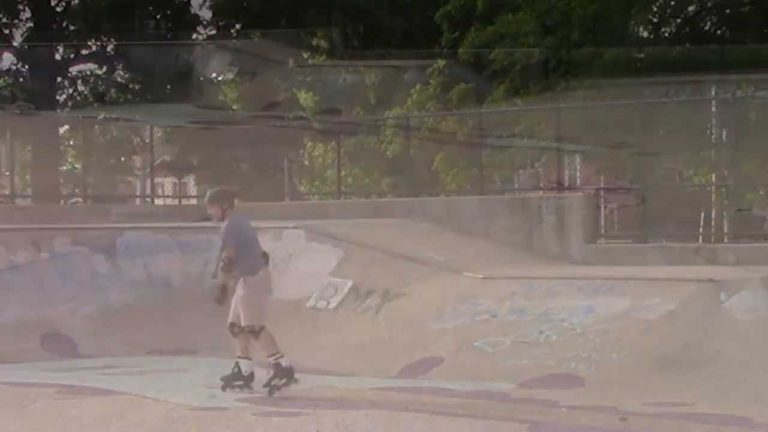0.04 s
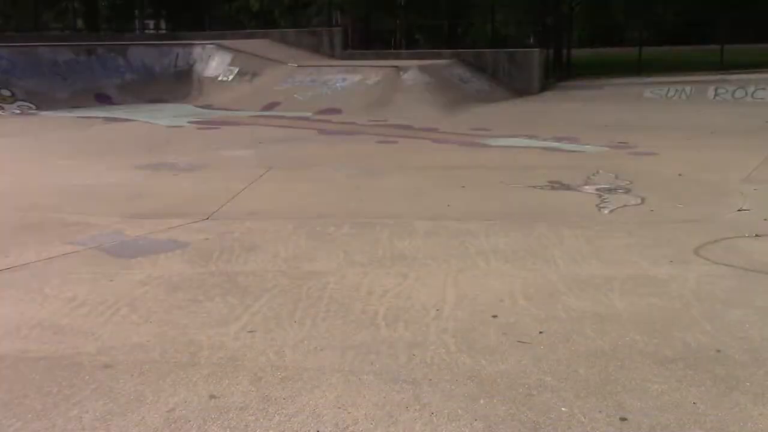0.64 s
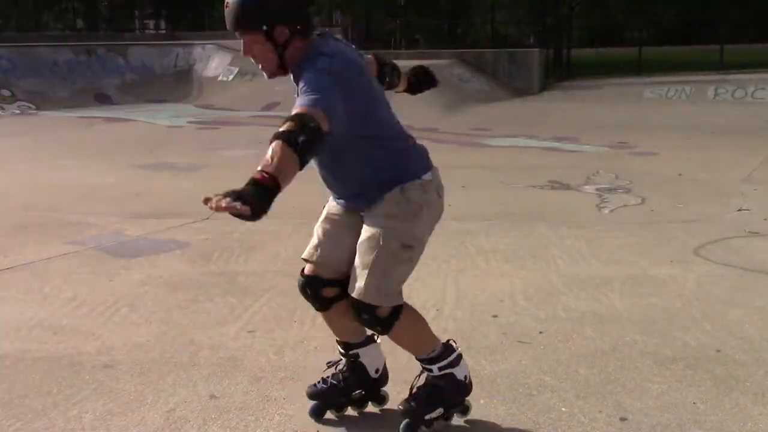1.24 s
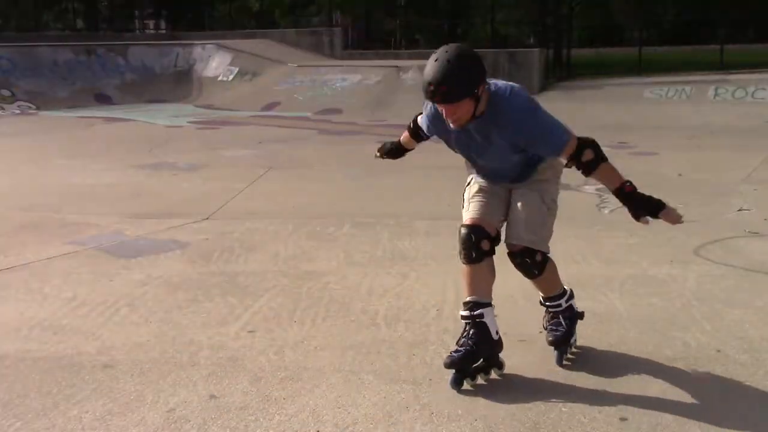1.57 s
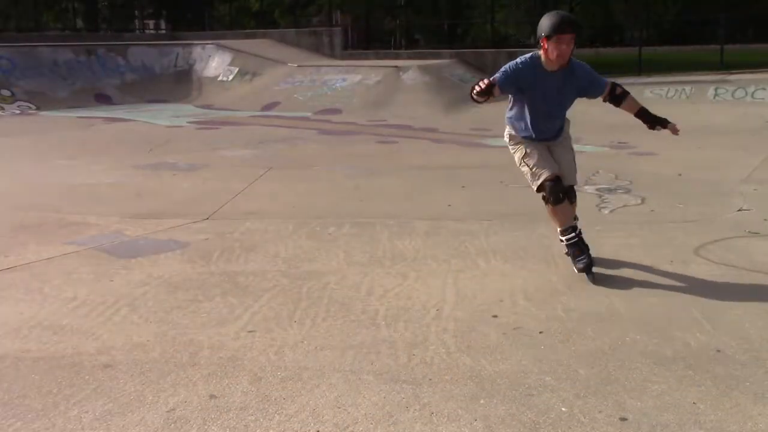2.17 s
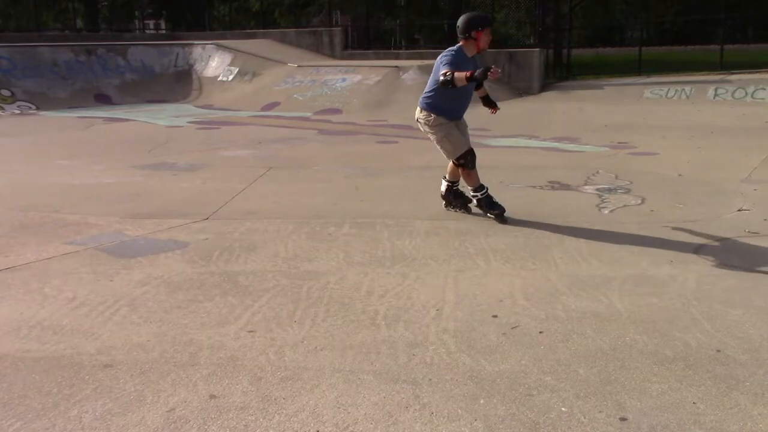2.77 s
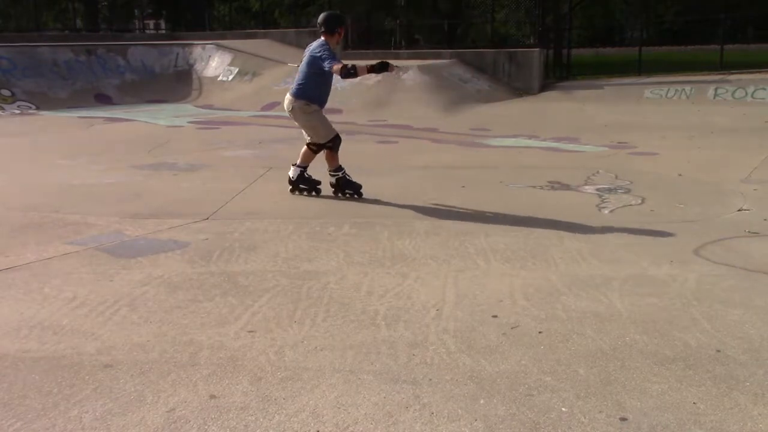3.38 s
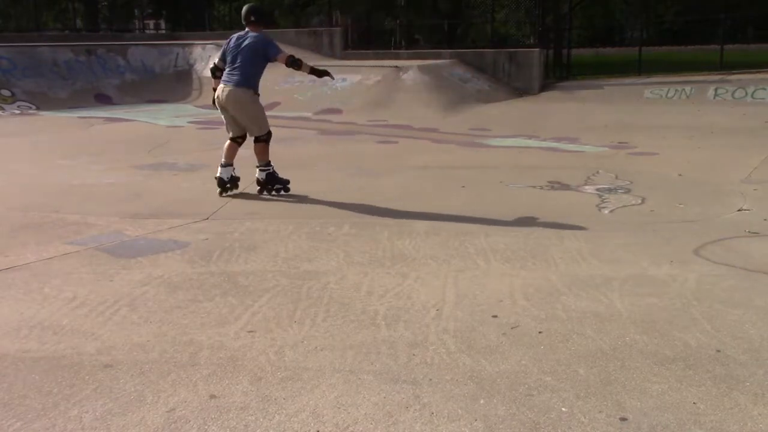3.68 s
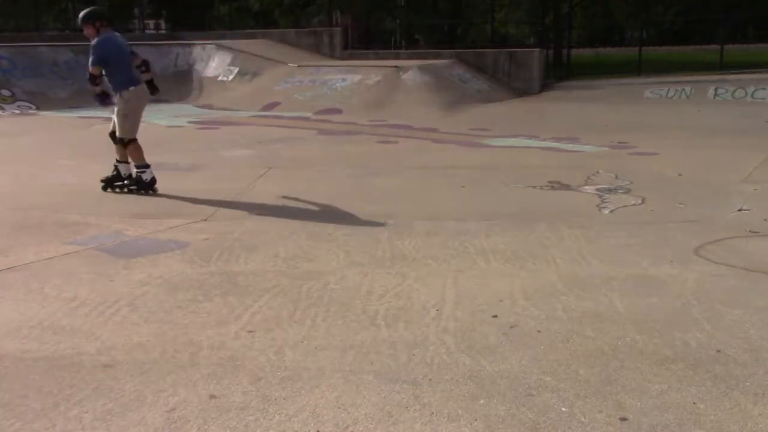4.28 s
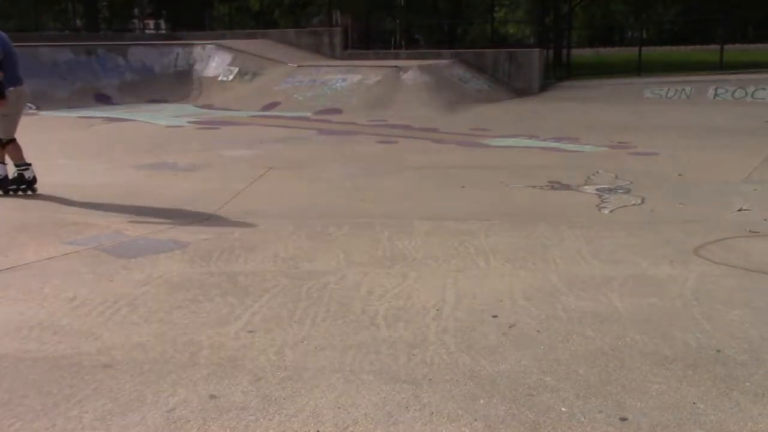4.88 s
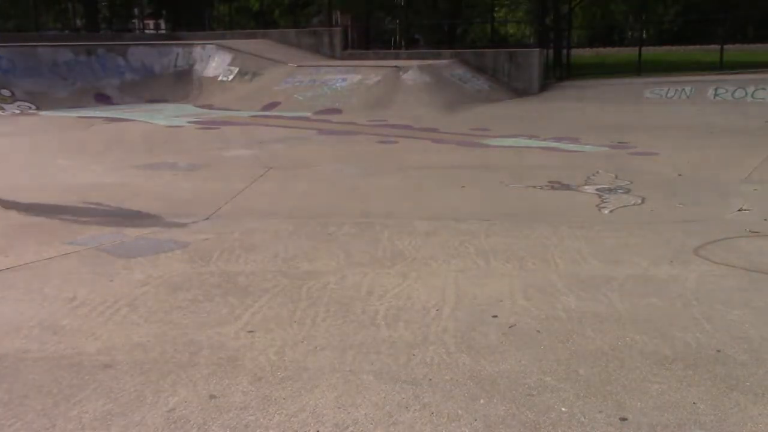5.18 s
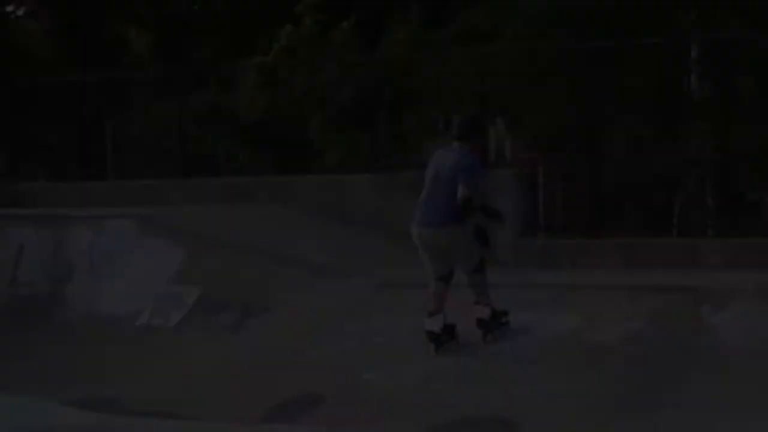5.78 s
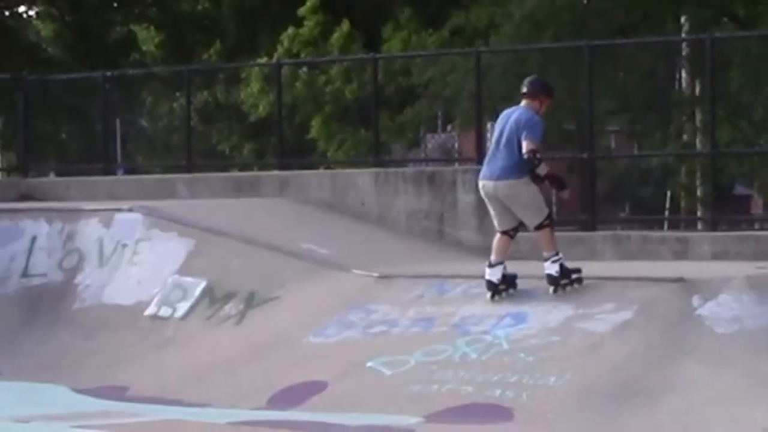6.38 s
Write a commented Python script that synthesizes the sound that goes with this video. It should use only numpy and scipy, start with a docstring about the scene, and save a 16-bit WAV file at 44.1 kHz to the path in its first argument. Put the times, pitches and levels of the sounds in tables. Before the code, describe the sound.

Wind rumbles on the microphone as a skater knocks over an edge, lands hard close by and rolls off, with faint birdsong behind.

```python
"""A concrete skate park: an inline skater rolls across, clacks over an edge, jumps, lands hard close by
and coasts away. Hard wheels drum on the gritty slab, so they roar and hiss, and grit and bearings tick.
Gusts of wind push on the microphone's two openings (its ports), making it rumble and flutter.
In the trees behind, a songbird whistles falling notes."""
import sys
import numpy as np
from scipy import signal
from scipy.fft import rfft, irfft, next_fast_len
from scipy.io import wavfile
from scipy.ndimage import uniform_filter1d

SR = 44100
rng = np.random.default_rng(int(sys.argv[2]) if len(sys.argv) > 2 else 0)


def master_out(mix):
    """Clip the mix to full scale and print it as 16-bit PCM to the path in sys.argv[1]."""
    frames = np.transpose(np.atleast_2d(mix))
    ceiling = np.clip(frames, -1, 1)
    pcm = np.round(ceiling * 32767).astype(np.int16)
    wavfile.write(sys.argv[1], SR, pcm)


N = 292383
TIME = np.arange(N) / SR

# Wheels on concrete, stage by stage. Each row: time in seconds, roar in dB, hiss in dB.
RUN_UP = [(0.0, -52.5, -56.5), (0.324, -50.5, -64.5), (0.69, -46, -57.5)]
IN_FLIGHT = [(0.78, -53.5, -61), (0.834, -54, -63), (1.18, -53, -65)]
RUN_OUT = [(1.29, -48.5, -55.5), (1.76, -49, -62), (1.91, -59, -70), (2.48, -49.5, -63.5),
           (2.93, -50.5, -63), (2.98, -57.5, -68), (3.47, -50, -62), (3.6, -54.5, -64), (3.7, -49, -62),
           (3.81, -60, -66.5), (3.87, -56, -62), (4.31, -52.5, -61.5), (4.4, -57.5, -70),
           (4.42, -58, -68.5)]
FAR_OFF = [(4.62, -63, -68), (4.85, -57.5, -62), (5.4, -58, -62), (6.13, -48.5, -51.5), (6.63, -49, -54)]
# The finest grit is only heard from nearby. Each row: time in seconds, boost for the grit in dB.
GRIT_NEARNESS = [(0.0, -11), (.8, -7), (1.6, -4), (2.1, -6.5), (3.4, -2), (4.1, -13), (6.63, -10.5)]
# Wheels, frames and cuffs slam home one after another. Each row: start in seconds, crack level in dB,
# crack fade time in seconds, ping pitch in Hz, ping level in dB, thud level in dB.
LANDING_HITS = [(1.2052, -22, 0.019, 1500, -7.5, -17), (1.2072, -7, 0.018, 8400, -7, -9),
                (1.2097, -5, 0.029, 6460, -17, -31.5), (1.2142, -17.5, 0.01, 7490, -9, -18.5),
                (1.216, -4.5, 0.011, 2550, -5, -26), (1.223, -15, 0.027, 1200, -20.5, -16.5),
                (1.2333, -5.5, 0.012, 3150, 4.5, -8.5), (1.2373, -19.5, 0.09, 3090, -15, -23.5),
                (1.2405, -14.5, 0.025, 7140, -11, -14)]
# Wheels knock over the edge. Each row: time in seconds, level in dB, treble cut-off in Hz.
EDGE_KNOCKS = [(0.7209, -10.5, 1297), (0.733, -9, 5510)]
# The tones of a struck part. Each row: pitch in Hz, level in dB, fade time in seconds.
BOOT_TONES = [(220, 3.5, 0.049), (340.3, 3.5, 0.038), (428, -4, 0.058), (727.5, -15.5, 0.0077),
              (912.5, -12.5, 0.1), (1126, -21.5, 0.12), (1520, -22.5, 0.04), (1516, -16.5, 0.032),
              (1910, -19, 0.022), (2690, -28.5, 0.045), (3200, -28, .04), (3650, -17, 0.043)]
WHEEL_TONES = [(363, -4, 0.022), (460, -0.5, 0.014), (633, -3, 0.018), (940, -6, 0.0098),
               (1496, -7.5, 0.012), (2344, -9, 0.0084), (3350, -7.5, 0.0078), (5650, -9, .004),
               (7300, -7.5, 0.0029)]
# Small clicks. Each row: time in seconds, level in dB.
MID_AIR_SNAPS = [(1.0282, -11.5), (1.0301, -16.5)]
GROUND_TICKS = [(0.395, -43), (1.3573, -37), (1.3788, -39), (2.0423, -41.5), (2.3425, -45.5), (2.7028, -45),
                (2.7313, -42), (3.1845, -50), (3.8756, -45), (3.941, -48), (4.6522, -46), (5.081, -46)]
# Dragging wheels. Each row: loudest moment in seconds, length in seconds, level in dB.
SCUFFS = [(0.724, 0.045, -33), (1.34, 0.14, -49.5), (1.52, 0.31, -45)]   # into the edge, and after the landing
TURN_SKIDS = [(3.70, 0.039, -46.5), (3.885, 0.031, -46.5), (3.965, 0.043, -46.5)]
# The tone colours of the skates' noises. Each row: frequency in Hz, relative strength in dB.
ROAR_COLOUR = [(30, -43), (70, -16), (150, -3.5), (300, 3), (550, 3.5), (1000, -1), (1900, -7),
               (3000, -14.5), (4500, -28), (8000, -37)]
HISS_COLOUR = [(1500, -6), (3000, 5), (4200, 1), (5500, -1), (7000, -2), (8600, -7), (10200, -9),
               (12000, -19), (15000, -39.5)]
GRIT_COLOUR = [(5000, -6.5), (8500, 14), (10000, 15.5), (12000, 6.5), (14000, 0.5), (16000, -13.5)]
CRACK_COLOUR = [(100, -37), (350, 6.5), (650, 7), (1000, -0.5), (1500, 1), (2000, -1.5), (2450, -6),
                (3100, -0.5), (3800, -10), (5800, -5), (8200, -5.5), (9200, -17.5), (11000, -15),
                (16000, -32.5)]
SNAP_COLOUR = [(400, -8.5), (1000, 3.5), (1650, 8), (2700, 1.5), (5000, -4.5), (7300, -1), (8300, -10),
               (10200, -6.5), (15000, -14.5)]
TICK_COLOUR = [(2000, -14.5), (4500, -1.5), (6500, -1.5), (8000, 3.5), (11000, -2), (15000, -11.5)]
SKID_COLOUR = [(2000, 8), (4500, -2), (7000, -4), (10000, 0.5), (12000, -21), (15000, -21)]

# The breeze swells twice, drops dead and returns. Each row: time in seconds, level in dB.
BREEZE_LEVELS = [(0.0, -53), (.9, -52), (1.12, -42), (1.84, -35), (2.1, -49), (2.35, -51), (2.63, -41.5),
                 (3.12, -48), (3.52, -41.5), (3.76, -39), (3.88, -35), (4.23, -28), (4.42, -44.5),
                 (4.58, -76), (4.8, -67), (5.5, -59), (5.66, -46), (6.05, -39.5), (6.63, -52.5)]
# Gusts that hit the ports. Each row: loudest moment in seconds, length in seconds, level in dB,
# how much louder its eddy (a small swirl of air) is on the left in dB.
GUSTS = [(0.171, .025, -35, -10), (1.083, 0.019, -28.5, 1), (1.111, 0.032, -27, -3), (1.258, 0.09, -19, 7),
         (1.411, 0.028, -25.5, -11), (1.542, 0.031, -23.5, -1), (1.615, 0.027, -18.5, -0.5),
         (1.698, 0.063, -27, 13), (1.85, 0.17, -29.5, -7), (2.706, 0.11, -34.5, -3),
         (2.921, 0.037, -21.5, 1), (2.96, 0.046, -27, -8), (3.509, 0.087, -29.5, 15),
         (3.911, 0.02, -23, 16), (3.962, 0.11, -18.5, 14), (4.057, 0.07, -25, 22), (4.146, 0.025, -16, 15),
         (4.179, 0.022, -20, 17), (4.209, 0.033, -15.5, -9), (4.302, 0.058, -18, 17),
         (4.77, 0.035, -42, -7), (4.842, 0.065, -39, -1), (5.073, 0.097, -45, 3), (5.259, 0.038, -48.5, 0),
         (5.753, 0.025, -32.5, 19), (5.9, 0.1, -38, 0), (6.426, .04, -44, 0)]
# How alike the wind is at the two ports. Each row: frequency in Hz, likeness (1 means the same).
WIND_LIKENESS = [(30, .9), (60, 0.22), (130, 0.69), (300, 0.075), (600, 0.54), (1400, 0.94)]
# The tone colours of wind and microphone hiss. Each row: frequency in Hz, relative strength in dB.
BUFFET_COLOUR = [(30, -62), (80, -23), (135, 1), (200, -2), (300, -10.5), (450, -15.5), (700, -28.5),
                 (1200, -43.5), (3000, -55), (16000, -120)]
FLUTTER_COLOUR = [(30, -40.5), (90, -30.5), (170, 2.5), (280, -1), (420, -13), (650, -21), (1100, -35.5),
                  (3000, -77.5), (16000, -120)]
RUMBLE_COLOUR = [(20, -34), (40, -12.5), (70, -2.5), (100, 5), (130, -2.5), (250, -32), (1000, -60.5),
                 (16000, -120)]
MIC_COLOUR = [(300, -21.5), (2000, 12), (7000, 3), (10000, -4.5), (12500, -2.5), (16000, -28)]
# The bird's song. Each row: start, length and time to glide halfway in seconds, first pitch and
# target pitch in Hz, level in dB, fading in dB per second (below zero, the note grows).
BIRD_NOTES = [(2.408, 0.36, 0.25, 3220, 1250, -67, -13), (2.587, 0.045, .025, 4150, 4470, -64, 0),
              (3.009, 0.35, 0.24, 3270, 1273, -60, -3), (3.918, 0.178, .06, 3344, 1550, -51.5, 15),
              (4.256, .16, 0.061, 3370, 1647, -54.5, 50.5), (4.585, 0.18, 0.064, 3370, 1404, -59.5, 83),
              (4.921, 0.17, .052, 3410, 1595, -47, 144), (5.25, 0.16, .06, 3350, 1596, -50.5, 100),
              (5.59, 0.23, 0.057, 3340, 1413, -56.5, 65)]


def rolling():
    """Wheels drum on the rough slab: coarse bumps roar, finer grains hiss and sizzle."""
    roar_db, hiss_db = in_time(np.vstack([RUN_UP, IN_FLIGHT, RUN_OUT, FAR_OFF]))
    grit_db = hiss_db + in_time(GRIT_NEARNESS)[0]
    slab_db = 0.27 * drift(24)
    roar = from_db(roar_db + 7 + slab_db) * colour(grains(per_s=12000, spread_db=3), ROAR_COLOUR)
    hiss = from_db(hiss_db + 5.5 + slab_db) * colour(grains(per_s=10000, spread_db=-1), HISS_COLOUR)
    grit_level = from_db(grit_db + 0.5 + 1.4 * drift(15))
    grit = grit_level * colour(grains(per_s=11000, spread_db=4), GRIT_COLOUR)
    # loose sand cracks under the wheels
    sand = dying(grains(per_s=22, spread_db=1.5), fade_s=0.0094) * rng.standard_normal(N)
    sand = from_db(-33.5 + 0.5 * grit_db) * colour(unit_level(sand), TICK_COLOUR)
    # the ramps return a dull, wide roar
    scatter = from_db(roar_db - 12.5) * colour(rng.standard_normal(N), ROAR_COLOUR)
    return stereo(mid=roar + hiss + grit + sand, side=dull(scatter, cutoff_hz=1400))


def landing():
    """Each hit is a burst of chatter with a brief ping of its own, and a thud into the boot."""
    chatter = colour(rng.standard_normal(N), CRACK_COLOUR)
    out, t = np.zeros(N), TIME[:SR // 10]
    ping_fade_s = 0.0052
    pressing = 1 - np.exp(-t / 0.000065)   # the wheel takes a moment to squash
    for start, crack_db, fade_s, ping_hz, ping_db, _ in LANDING_HITS:
        span = slice(round(start * SR), round(start * SR) + len(t))
        crack = from_db(crack_db - 60 * t / fade_s) * chatter[span]
        ping = from_db(ping_db - 60 * t / ping_fade_s) * np.sin(2 * np.pi * ping_hz * t)
        out[span] += pressing * (crack + ping)
    thuds = clicks([(start, thud_db) for start, *_, thud_db in LANDING_HITS])
    return out + struck(thuds, BOOT_TONES)


def knocks():
    """The edge strikes the wheels; a softer blow rings mostly their low tones."""
    blows = sum(dull(clicks([(s, db)]) + 1e-18, cutoff_hz) for s, db, cutoff_hz in EDGE_KNOCKS)
    return struck(blows, WHEEL_TONES)


def ticks():
    """Loose skate parts snap in mid-air; on the ground, grit and bearings give tiny bright ticks."""
    snaps = colour(clicks(MID_AIR_SNAPS), SNAP_COLOUR)
    fizz = dying(clicks(GROUND_TICKS), fade_s=0.015) * rng.standard_normal(N)
    return snaps + from_db(0.5) * colour(fizz, TICK_COLOUR)


def scraping():
    """Wheels stick and slip in short bursts where they drag, or skid sideways in a turn."""
    scuff = swells(SCUFFS) * colour(grains(per_s=3700, spread_db=6), SNAP_COLOUR)
    skid = swells(TURN_SKIDS) * colour(grains(per_s=590, spread_db=0.5), SKID_COLOUR)
    return dull(scuff, cutoff_hz=4500) + skid


def wind():
    """Air buffets and flutters at the ports over a deep rumble; stronger wind sounds wider."""
    breeze_db, = in_time(BREEZE_LEVELS)
    breeze = from_db(breeze_db + 3.5 * drift(12))
    gusts = swells([row[:3] for row in GUSTS])

    def strength(breeze_db, gust_db):
        """Breeze and gusts add up by their power."""
        return np.hypot(from_db(breeze_db) * breeze, from_db(gust_db) * gusts)

    lumps = from_db(4.7 * np.array([drift(43), drift(41)]))
    buffet = strength(breeze_db=3, gust_db=-4) * lumps * turbulence(BUFFET_COLOUR)
    flicker = from_db(3.4 * drift(55))
    flutter = strength(breeze_db=-1.5, gust_db=-2) * flicker * turbulence(FLUTTER_COLOUR)
    left, right = buffet + flutter + eddies()
    rumble = strength(breeze_db=1.5, gust_db=-16) * turbulence(RUMBLE_COLOUR).mean(axis=0)
    width = np.clip((20 * np.log10(breeze + gusts) + 53.8) / 15, 0.05, 1.1)
    side = (left - right) / 2 * width
    side = signal.sosfilt(signal.butter(4, 85, "high", fs=SR, output="sos"), side)   # centres the bass
    return stereo((left + right) / 2 + rumble, side)


def turbulence(spectrum):
    """Churning air at an even level, only partly alike at the two ports."""
    size = next_fast_len(N)
    hz = np.fft.rfftfreq(size, 1 / SR)
    alike = np.clip(at_hz(WIND_LIKENESS, hz), -1, 1)
    mid, side = rfft(rng.standard_normal((2, size))) * from_db(at_hz(spectrum, hz))
    mid = irfft(np.sqrt(1 + alike) * mid)[:N]
    side = irfft(np.sqrt(1 - alike) * side)[:N]
    power = uniform_filter1d(mid ** 2 + side ** 2, size=1500)
    return stereo(mid, side) / np.sqrt(power + 1e-20)


def eddies():
    """Each gust carries an eddy: one smooth dip in air pressure with a rise before and after."""
    pitch_hz, boost_db, lag_s = 250, 7, 0.00329
    out, t = np.zeros((2, N)), TIME[:SR // 40]
    for peak_s, _, db, pan_db in GUSTS:
        phase = np.pi * pitch_hz * rng.uniform(0.93, 1.03) * (t - t.mean())
        dip = (2 * phase ** 2 - 1) * np.exp(-phase ** 2)
        start = round((peak_s + lag_s) * SR) - len(t) // 2
        out[:, start:start + len(t)] += from_db(stereo(db + boost_db, pan_db / 2)) * dip
    return out


def bird():
    """Pure falling whistles, two slow and then a quick run, with a stray chirp; the trees blur them."""
    edge_s, steepness, flicker_db = 0.0042, 2.3, 2.5
    song = np.zeros(N)
    for start, length, halfway, first_hz, target_hz, db, fading in BIRD_NOTES:
        t, at = TIME[:round(length * SR)], round(start * SR)
        # a note holds its first pitch, glides, then levels off
        hz = target_hz + (first_hz - target_hz) / (1 + (t / halfway) ** steepness)
        edges = np.clip(np.minimum(t, length - t) / edge_s, 0, 1)
        whistle = np.sin(2 * np.pi * np.cumsum(hz) / SR)
        song[at:at + len(t)] += edges * from_db(db - fading * t) * whistle
    # echoes off nearby branches mix with the glide and break it up
    flicker = from_db(flicker_db * drift(30))
    song = flicker * (0.8 * song + 0.45 * park_echo(song, fade_s=0.06, cutoff_hz=8000))
    return from_db(2) * song + from_db(-7) * park_echo(song, fade_s=0.97, cutoff_hz=6000)


def park_echo(x, fade_s, cutoff_hz):
    """Ramps and trees scatter a sound into a dull wash that dies away."""
    t = TIME[:SR]
    build_up = 1 - np.exp(-t / 0.0077)
    tail = dull(rng.standard_normal(SR) * from_db(-60 * t / fade_s) * build_up, cutoff_hz)
    return signal.oaconvolve(x, tail / np.linalg.norm(tail))[:N]


def mic_hiss():
    """The microphone's own faint hiss, separate for left and right."""
    return from_db(-68.5) * np.array([colour(rng.standard_normal(N), MIC_COLOUR) for _ in range(2)])


def from_db(db):
    """Turns decibels into a number to multiply by."""
    return 10 ** (np.asarray(db) / 20)


def unit_level(x):
    """Scales a signal to an average power of 1."""
    return x / np.sqrt(np.mean(x ** 2) + 1e-20)


def stereo(mid, side):
    """Left is mid plus side; right is mid minus side."""
    return mid + side * np.array([[1], [-1]])


def in_time(rows):
    """Joins timed rows with straight lines, giving one curve for each column of levels."""
    seconds, *columns = np.transpose(rows)
    return [np.interp(TIME, seconds, column) for column in columns]


def at_hz(points, hz):
    """Reads between a table's frequencies, with octaves evenly spaced."""
    known_hz, value = np.transpose(points)
    return np.interp(np.log(hz + 1), np.log(known_hz), value)


def dull(x, cutoff_hz):
    """Gently turns down the treble above the cut-off."""
    return signal.sosfilt(signal.butter(1, cutoff_hz, fs=SR, output="sos"), x)


def colour(x, spectrum, size=4096):
    """Gives a sound a tone colour; white noise keeps its power."""
    gain = unit_level(from_db(at_hz(spectrum, np.fft.rfftfreq(size, 1 / SR))))
    # a minimum-phase filter: it rings after a click, never before
    cepstrum = irfft(np.log(gain))[:size // 2]
    cepstrum[0] /= 2
    response = irfft(np.exp(rfft(2 * cepstrum, size)))
    return signal.oaconvolve(x, response)[:N]


def drift(rate_hz):
    """A smooth random wobble, about 1 in size."""
    memory = np.exp(-80 * np.pi * rate_hz / SR)
    noise = rng.standard_normal(N // 40 + 2002)
    slow = signal.lfilter([1], [1, -2 * memory, memory * memory], noise)[2000:]
    return np.interp(np.arange(N) / 40, np.arange(len(slow)), unit_level(slow))


def grains(per_s, spread_db):
    """Tiny contacts of uneven size at random moments."""
    sizes = from_db(spread_db * np.minimum(rng.exponential(1, N), 4)) * rng.choice([-1, 1], N)
    return unit_level(sizes * (rng.random(N) < per_s / SR))


def clicks(rows):
    """One sharp click for each row."""
    out = np.zeros(N)
    for s, db in rows:
        out[round(s * SR)] += from_db(db)
    return out


def swells(rows):
    """One smooth rise and fall in level for each row."""
    return sum(from_db(db) * np.exp(-np.minimum((2 * (TIME - peak_s) / length) ** 2, 20))
               for peak_s, length, db in rows)


def dying(x, fade_s):
    """Gives each click a tail that drops 60 dB in the fade time."""
    return signal.lfilter([1], [1, -from_db(-60 / (fade_s * SR))], x + 1e-18)


def ring(x, hz, fade_s):
    """Each click starts a pure tone that fades away."""
    decay, step = from_db(-60 / (fade_s * SR)), 2 * np.pi * hz / SR
    return signal.lfilter([0, np.sin(step)], [1, -2 * decay * np.cos(step), decay * decay], x + 1e-18)


def struck(x, tones):
    """A struck part rings with all its tones at once, every second one upside down."""
    return sum((-1) ** k * from_db(db) * ring(x, hz, fade_s) for k, (hz, db, fade_s) in enumerate(tones))


def scene():
    """Skates, bird and wind over a faint hiss; the open park gives little echo."""
    blows = landing() + knocks() + ticks()
    echo = from_db(-30) * park_echo(blows, fade_s=0.87, cutoff_hz=2200)
    hiss = mic_hiss()
    return blows + echo + rolling() + scraping() + bird() + wind() + hiss


def record(dry):
    """The microphone thins the deep bass, rounds off the peaks and cuts the highest treble."""
    bass_hz, top_hz = 48, 15900
    thinned = signal.sosfilt(signal.butter(2, bass_hz, "high", fs=SR, output="sos"), dry)
    rounded = thinned / (1 + thinned ** 4) ** (1 / 4)
    return signal.sosfilt(signal.ellip(10, 0.2, 80, top_hz, fs=SR, output="sos"), rounded)


dry = scene()
out = record(dry)
master_out(out)
```